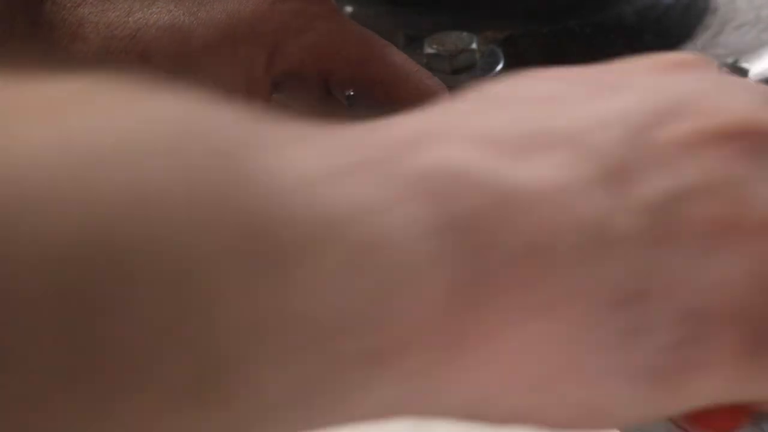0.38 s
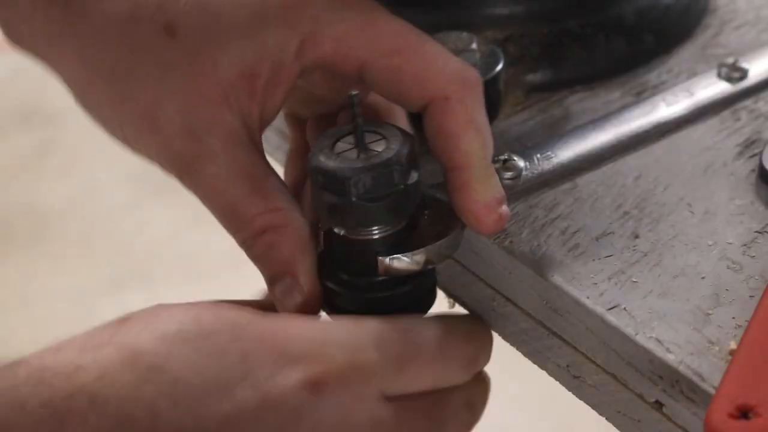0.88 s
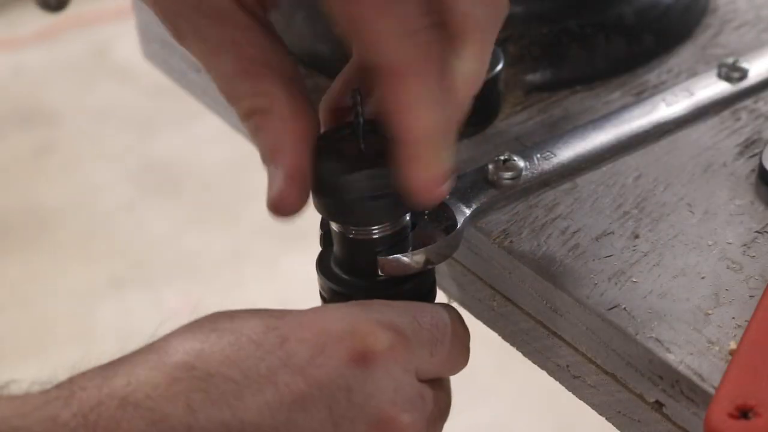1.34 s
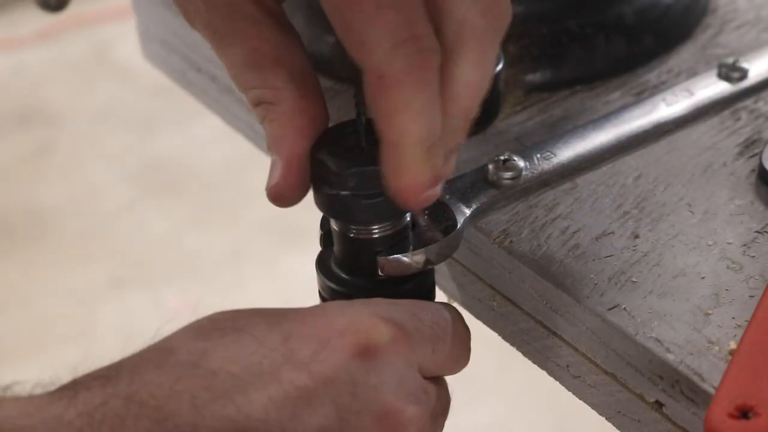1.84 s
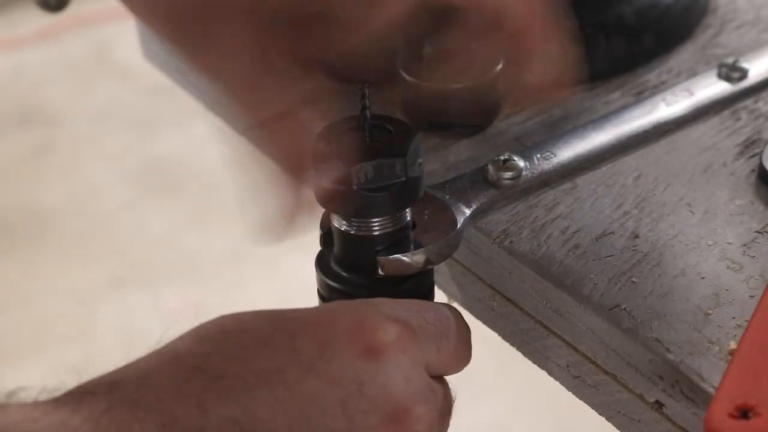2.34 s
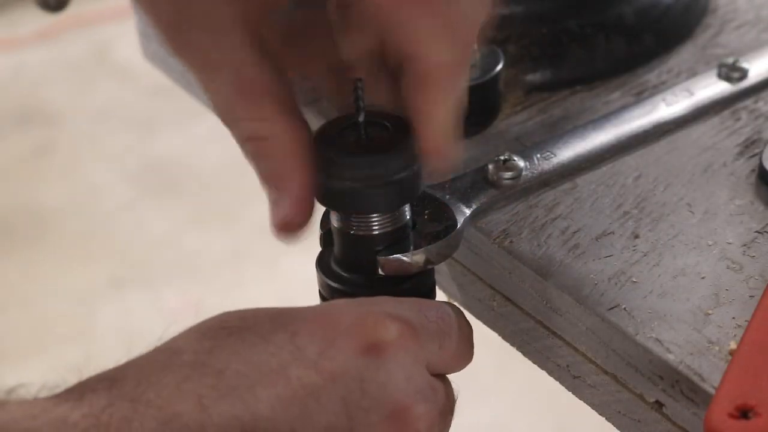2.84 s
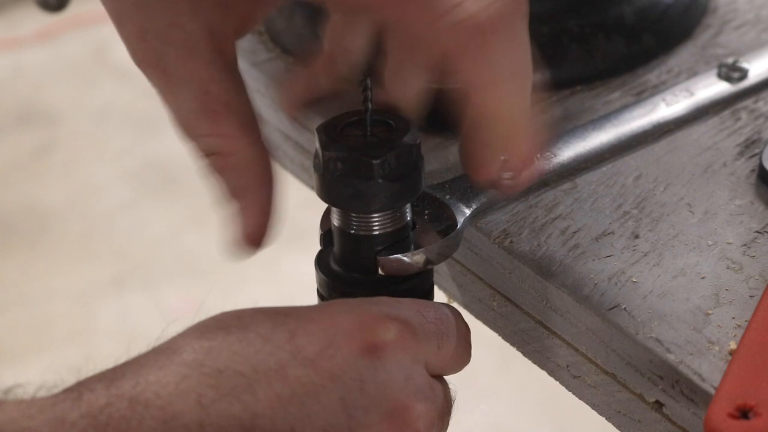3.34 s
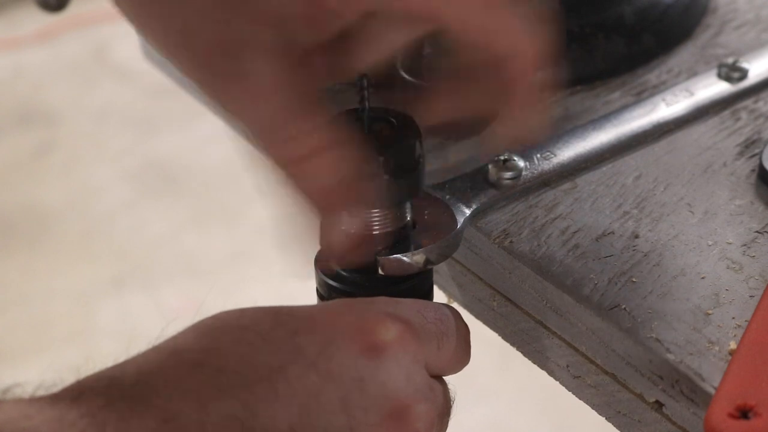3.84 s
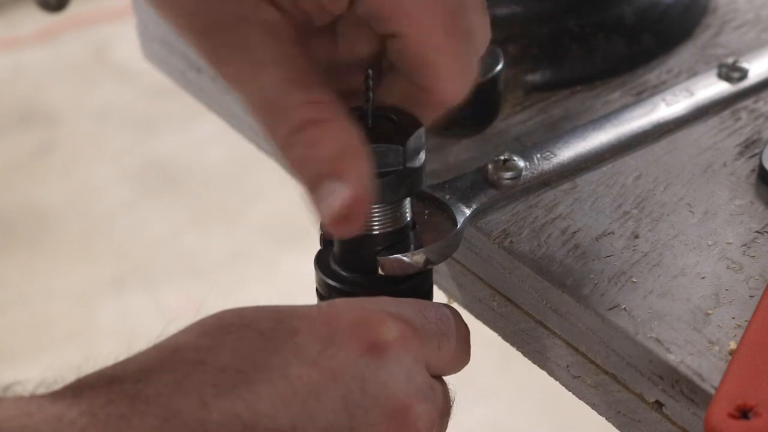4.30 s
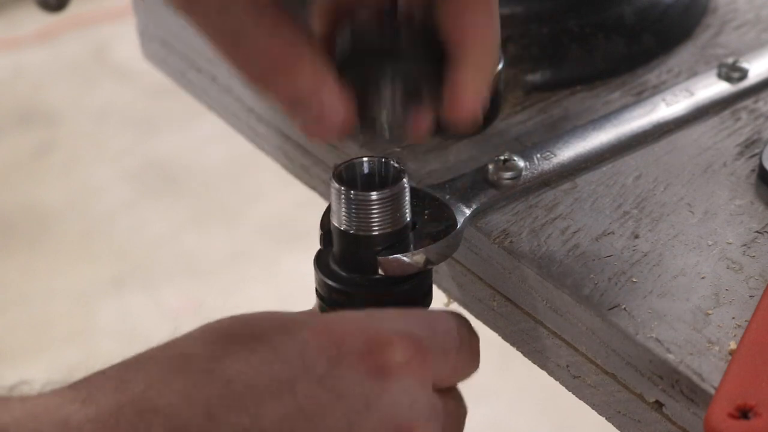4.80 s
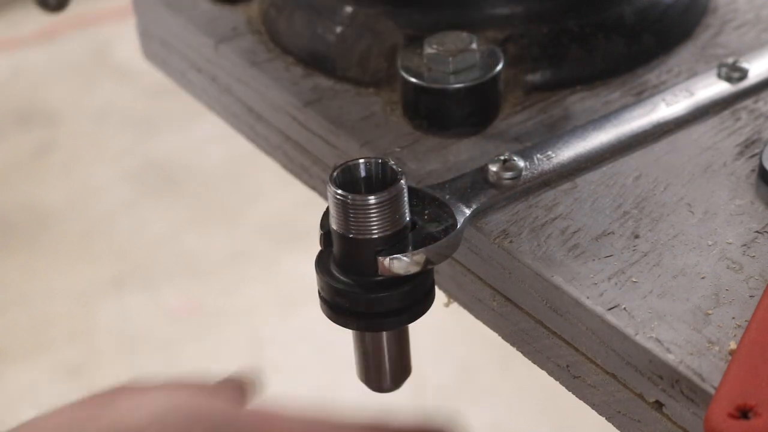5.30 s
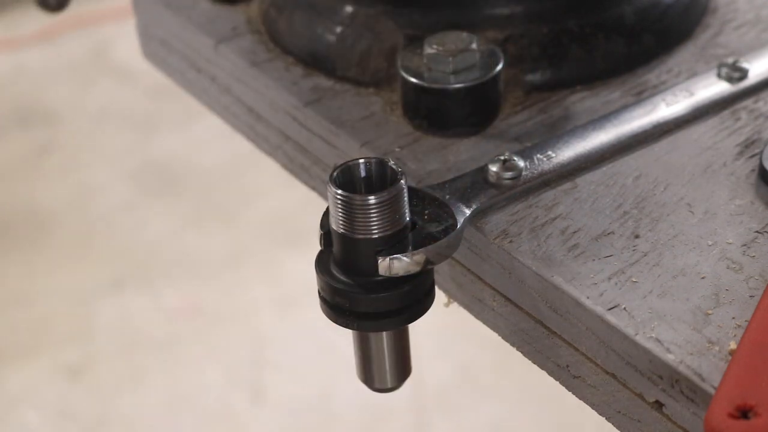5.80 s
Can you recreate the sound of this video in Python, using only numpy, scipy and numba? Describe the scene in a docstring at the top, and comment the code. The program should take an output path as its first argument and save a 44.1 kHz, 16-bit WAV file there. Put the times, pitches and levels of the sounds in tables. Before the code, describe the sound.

A steel wrench clatters onto a workbench and skids, then fingers spin a nut off a tool holder with ticks, scuffs and tiny squeaks.

```python
"""Dropped wrench and a spun nut

A steel wrench drops on a workbench, bounces and skids; then fingers spin a nut off a tool holder, turn by turn.
The blows ring damped modes of bench, steel and holder; the nut ticks, scuffs, rubs and squeaks (gliding overtones).
A hard workshop echoes it all in dense decaying noise, over a hush with mains hum and a brushing hand.
A close microphone limits the loudest blows, so the echo swells up after them."""
import sys
import numpy as np
from scipy import signal
from scipy.fft import rfft, irfft
from scipy.io import wavfile
from scipy.ndimage import uniform_filter1d, map_coordinates
from numba import njit

SR = 44100
rng = np.random.default_rng(int(sys.argv[2]) if len(sys.argv) > 2 else 0)


def transcribe(u):
    """Save the signal u as a 16-bit wav file named by the first command-line argument.

    u: samples, shape (n,) or (channels, n), limited to [-1, 1]; the rate is SR.
    q: integer samples, one column per channel.
    """
    v = np.clip(np.atleast_2d(u).T, -1, 1)
    q = np.round(v * 32767).astype(np.int16)
    wavfile.write(sys.argv[1], SR, q)


def ratio(d):
    """dB to gain"""
    e = np.asarray(d, float) / 20
    return 10 ** e


N = 261072
T = np.arange(N) / SR

# wrench bounces: t/s, blow level/dB, steel ring against the blow/dB, crack against the blow/dB
BOUNCES = [(0.4982, -15, -13.5, -26), (0.5112, -19.5, -20, -8.5), (0.549, -45, -2, -20),
           (0.5604, -23, -11, -14), (0.579, -25.5, -20, -26), (0.609, -27.5, -23, -20),
           (0.621, -47, -2, -22), (0.6354, -19, -22.5, -15), (0.6526, -3.5, -18, -7.5),
           (0.699, -23, -5, -14), (0.731, -32.5, -4, -5), (.745, -25, -12.5, -16)]
# modes of the bench: f/Hz, level/dB, t60/s
BENCH_MODES = [(370, -11, .05), (436, -9, .05), (530, -11, .04), (690, -11, .035), (745, -9, .035),
               (850, -8, .03), (920, -8, .035), (1010, -6, .035), (1098, -4, .04), (1258, 0, .045),
               (1400, -4, .03), (1510, -3, .035), (1712, -9, .02), (2000, -13, .02)]
# high modes of the nut: f/Hz, level/dB, t60/s
NUT_MODES = [(12500, -12, .025), (14800, -3, .012)]


def level(x, db):
    """Scale to an rms level."""
    return x * ratio(db) / np.sqrt(np.mean(x ** 2))


def on_log(hz, table):
    """Read a (f/Hz, value) table on a log frequency axis."""
    table_hz, values = np.array(table)[:, 0], np.array(table)[:, 1]
    return np.interp(np.log(hz + 1), np.log(table_hz), values)


def colour(table):
    """Noise with the given spectrum."""
    spectrum = rfft(rng.standard_normal(N))
    return irfft(spectrum * ratio(on_log(np.fft.rfftfreq(N, 1 / SR), table)), N)


def band(x, hz, octaves):
    """Band-pass reaching the given octaves to either side of hz."""
    edges = np.clip([hz * 2 ** -octaves, hz * 2 ** octaves], 50, .45 * SR)
    return signal.sosfilt(signal.butter(2, edges, "band", fs=SR, output="sos"), x)


def ring(x, modes):
    """Damped resonators; a unit click rings each at its dB."""
    out = 0
    for hz, db, t60 in modes:
        pole = np.exp(2j * np.pi * hz / SR - np.log(1000) / (max(t60, 1e-3) * SR))
        out = out + ratio(db) * signal.lfilter([1], [1, -pole], x).imag
    return out


def add(track, s, sound, db):
    """Mix a sound in at time s with its peak at db."""
    i = int(s * SR)
    track[i:i + len(sound)] += (sound * ratio(db) / np.abs(sound).max())[:N - i]


def contact(rise_s, fall_s):
    """A short rough push: noise that rises and dies."""
    t = T[:8000]
    swell = 1 - np.exp(-t / max(rise_s, 1e-5))
    return rng.standard_normal(len(t)) * swell * np.exp(-t / max(fall_s, 1e-4))


def click(fall_s, scatter):
    """One sharp contact with a little chatter behind it."""
    push = scatter * contact(0.0015, fall_s)
    push[0] = 1
    return push


def grit(per_s, spread_db):
    """Sparse random clicks of uneven size."""
    chance = rng.random((2, N))
    size = ratio(-spread_db * np.log(1 - chance[1]))
    return (chance[0] < per_s / SR) * size * rng.choice([-1, 1], N)


def held(rows, attack_s, release_s):
    """Gain over time: each (start, length, dB) row rises, holds and lets go."""
    gain = 0
    for s, length, db in rows:
        slopes = np.minimum((T - s) / attack_s, (s + length - T) / release_s)
        gain = gain + ratio(db) * np.clip(slopes, 0, 1)
    return gain


def wrench():
    """Each bounce thuds on the bench, rings the steel and cracks."""
    # modes of the wrench: f/Hz, level/dB, t60/s
    wrench_modes = [(2455, -3, .05), (4452, -12, .055), (5190, 0, .035), (7257, -9, .03)]
    thuds, steel = np.zeros((2, N))
    for s, db, steel_db, crack_db in BOUNCES:
        # wood gives way, so the bench feels a softer push than the steel
        add(thuds, s, ring(band(click(0.0084, 0.12), 840, 1.31), BENCH_MODES), db)
        add(steel, s, ring(band(click(0.004, 0.16), 4200, 0.7), wrench_modes), db + steel_db)
        add(thuds, s, band(click(.001, .15), 3000, 1.5), db + crack_db)
    return thuds, steel


def add_thumps(dry):
    """The bench's deep shudder under each bounce: one low damped mode, mixed into dry."""
    thump_hz, thump_db = 125, -39
    for s, db, _, _ in BOUNCES:
        add(dry, s, ring(click(0.0079, 0.14), [(thump_hz, 0, .06)]), db + thump_db)


def skids():
    """The wrench rocks and skids between bounces: many small knocks on the bench and a grainy scrape."""
    # skids: start t/s, length/s, level/dB of the push before the gains below
    skid_rows = [(.575, 0.06, -42.5), (.75, 0.11, -35.5)]
    knocks_per_s, knock_db, scrape_db = 210, -28, 1
    knocks, gain = grit(knocks_per_s, 1.5), held(skid_rows, .03, .04)
    knocks = level(knocks, 0) * gain
    scrape = band(rng.standard_normal(N) * gain, 2670, 0.29)
    return ratio(knock_db) * ring(band(knocks, 820, 1.5), BENCH_MODES) + ratio(scrape_db) * scrape


def thud(push, hz):
    """Holder and bench answer: holder modes near hz stand out, a little different each time."""
    # modes of the tool holder: f/Hz, level/dB, t60/s
    holder_modes = [(368, -1, .07), (745, -2, .03), (860, 0, .026), (980, 0, .024), (1120, -2, .02),
                    (1490, -2, .016)]
    scatter_db = 3
    modes = [(f, db + scatter_db * rng.standard_normal(), t60) for f, db, t60 in holder_modes]
    return ring(band(push, hz, 0.21), modes) + ratio(1.0) * ring(push, BENCH_MODES)


def ticks():
    """Steel on steel: heavily damped bite, a dry broad crack, a treble snap, a thud."""
    # sharp ticks: t/s, crack peak level/dB, crack f/Hz, thud against crack/dB, treble against crack/dB
    tick_rows = [(0.9698, -42, 2280, -17, -30), (0.9841, -37.5, 2590, -0.5, -34),
                 (1.0012, -21, 2740, -15, -21), (1.01, -35.5, 2240, 5.5, -40), (1.049, -35.5, 2310, 0, -26),
                 (1.0874, -27.5, 2170, -6, -37), (1.106, -31.5, 2380, 4, -40), (1.11, -22.5, 2570, -9, -26),
                 (1.1147, -32, 2120, -12, -29), (1.2, -35.5, 4440, -18, -31),
                 (1.294, -27.5, 5250, -10, -56), (1.3624, -35.5, 5150, 1.5, -37),
                 (1.5857, -37.5, 2180, -1.5, -29), (1.7087, -35, 4830, -12, -45),
                 (2.044, -29.5, 3150, -5, -19), (2.188, -48, 5840, -20, -8), (2.47, -26, 5250, -15, -5.5),
                 (2.776, -43, 4300, -7.5, -44), (2.8814, -56.5, 6000, -5, 4), (3.1741, -38, 2200, -2, -30),
                 (3.2812, -9.5, 2730, -15.5, -10.5), (3.286, -15.5, 1920, -8.5, -21),
                 (3.534, -30, 2800, -7.5, -3.5), (3.572, -37.5, 2560, 6.5, -25.5),
                 (3.6744, -51, 2850, 3, -22), (3.7751, -37, 3380, -8, -30), (3.784, -29.5, 2230, -4.5, -24),
                 (4.1252, -40, 2500, -1.5, -23), (4.2133, -30.5, 2940, -14.5, -15),
                 (4.2676, -40, 2800, -2.5, -28), (4.2828, -37, 2310, 3, -33), (4.4361, -42, 4150, -9, -43),
                 (4.4694, -57, 6000, -0.5, 1), (4.6602, -49.5, 3050, -24, -6),
                 (5.778, -46.5, 3600, -27, -24), (5.7905, -47.5, 2960, -33, -33)]
    # heavily damped steel in each tick: f/Hz, level/dB, t60/s
    bite_modes = [(5210, 0.5, 0.019), (3600, 13.5, 0.0023), (2470, -2, 0.02), (1970, 1.5, 0.021)]
    bite_db, thud_hz, thud_lag_s = -8.5, 980, 0.000996
    out = np.zeros(N)
    for s, db, hz, thud_db, treble_db in tick_rows:
        push = click(.003, .25)
        add(out, s, ring(push, bite_modes), db + bite_db)
        add(out, s, band(band(push, 0.88 * hz, 0.51), hz, 1.72), db)
        snap = click(.0008, .2)
        treble = band(band(snap, 11300, .35), 11300, .35) + ratio(-7) * ring(snap, NUT_MODES)
        add(out, s, treble, db + treble_db)
        add(out, s + thud_lag_s, thud(contact(0.00072, 0.0087), thud_hz), db + thud_db)
    return out


def scuffs():
    """The thread catches and drags: a longer, softer push makes a scrape and a thud."""
    # soft scuffs: t/s, scrape peak level/dB, thud against scrape/dB, centre of the push f/Hz, length/s
    scuff_rows = [(1.0328, -44, 8, 1050, 0.014), (1.151, -34, -3.5, 830, 0.0069),
                  (1.3437, -30.5, -4.5, 680, 0.0056), (1.475, -48.5, -5, 1580, 0.017),
                  (1.51, -49, 3, 965, 0.018), (1.534, -47.5, 1.5, 950, 0.0043),
                  (1.9573, -52, 7, 344, 0.013), (2.0333, -37, -3.5, 880, 0.013),
                  (2.054, -57, 20.5, 885, 0.0093), (2.195, -50, -5, 870, 0.026),
                  (2.244, -49, -14.5, 1490, 0.031), (2.589, -42, -5, 1560, 0.034),
                  (2.874, -63.5, 14, 574, 0.031), (2.959, -47.5, 2, 900, 0.0065),
                  (2.97, -35.5, -7, 910, 0.012), (3.194, -53, 5.5, 1190, 0.033),
                  (3.464, -55, 14, 1000, 0.0077), (3.599, -51.5, 6, 920, 0.016),
                  (4.141, -52.5, -1.5, 378, 0.024), (4.233, -36.5, 0.5, 960, 0.011),
                  (4.5993, -46.5, -2, 980, 0.025), (4.644, -50, 4.5, 394, 0.015),
                  (4.78, -75, 18.5, 417, 0.0052), (5.166, -60.5, 10.5, 830, 0.014),
                  (5.2946, -68, 13, 790, 0.0057)]
    scrape_hz = 1955  # the two bands of the scrape lie below and above it
    out = np.zeros(N)
    for s, db, thud_db, push_hz, length_s in scuff_rows:
        push = contact(length_s / 2, length_s)
        scrape = band(band(push, 0.46 * scrape_hz, 0.39), 1.42 * scrape_hz, 0.56)
        add(out, s, scrape, db)
        add(out, s, thud(band(push, 370, 1.35), push_hz), db + thud_db)
    return out


def squeaks():
    """Stick-slip whistle: gliding, fluttering overtones, loudest where they cross a narrow resonance."""
    # squeaks of the thread, one list of points each: t/s, stick-slip rate f/Hz, level/dB
    squeak_paths = [
        [(2.198, 1797, -63), (2.21, 2107, -56), (2.225, 2247, -55), (2.245, 2120, -57), (2.254, 1802, -40),
         (2.258, 1895, -60), (2.262, 1786, -49.5), (2.272, 1190, -58)],
        [(2.581, 1465, -49), (2.586, 1710, -55), (2.593, 2034, -44), (2.599, 2896, -66), (2.615, 2920, -38),
         (2.623, 2560, -57), (2.64, 2340, -53)],
        [(2.892, 1240, -58), (2.897, 1944, -57), (2.904, 2720, -40.5), (2.91, 3050, -52), (2.917, 3616, -47.5),
         (2.926, 3660, -59), (2.934, 3150, -57), (2.947, 3300, -67)],
        [(4.64, 2630, -72), (4.653, 2930, -52.5), (4.666, 2780, -69)],
    ]
    # voice of each squeak: step from one overtone to the next/dB, pitch flutter (0-1)
    voices = [(-13, .22), (-25, .36), (-11, .12), (-30, .45)]
    resonance_hz, lift_db, width_octaves = 3720, 19, .06
    out = np.zeros(N)
    for path, (overtone_db, wobble) in zip(squeak_paths, voices):
        s, hz, db = np.transpose(path)
        now = (T > s[0]) & (T < s[-1])
        flutter = uniform_filter1d(rng.standard_normal((2, N // 20)), size=60)[:, :now.sum()]
        rate = np.interp(T[now], s, hz)
        phase = 2 * np.pi * np.cumsum(rate * (1 + wobble * flutter[0])) / SR
        stack = 0
        for k in range(1, 4):
            octaves_off = np.log2(k * rate / resonance_hz)
            resonance_db = lift_db * np.exp(-(octaves_off / width_octaves) ** 2)
            stack = stack + ratio(overtone_db * (k - 1) + resonance_db) * np.sin(k * phase)
        out[now] += ratio(np.interp(T[now], s, db) + 24 * flutter[1]) * stack
    return out


def rub():
    """Gritty sliding of the thread sings in the nut's high modes; the loose nut chatters as it turns."""
    # fingers turning the nut: start t/s, length/s, rub level/dB
    turn_rows = [(1.47, 0.12, -80), (2.2, 0.071, -71), (2.57, 0.091, -75), (2.88, 0.082, -69.5),
                 (3.16, 0.091, -69.5), (3.53, 0.067, -80), (3.68, 0.12, -80.5), (4.19, 0.12, -76),
                 (4.6, 0.028, -70.5)]
    attack_s, release_s = 0.018, 0.0099
    chatter_per_s, chatter_db = 470, 10  # dB against the rub
    sliding = rng.standard_normal(N) * ratio(2.5 * rng.exponential(size=N))
    singing = level(ring(sliding, NUT_MODES) + 4.0 * band(sliding, 11700, 0.37), 0)
    chatter = band(band(grit(chatter_per_s, 1.5), 2600, .6), 2600, .6)
    return (singing + level(chatter, chatter_db)) * held(turn_rows, attack_s, release_s)


def pings():
    """A single high steel mode rings until a finger damps it; the lifted nut jingles faintly."""
    # clear pings: t/s, peak level/dB
    ping_rows = [(1.199, -43), (2.47, -52)]
    # jingle of the lifted nut: start t/s, length/s, level/dB
    lifted_rows = [(4.64, 0.73, -90)]
    ping_hz, t60_s, held_s = 6670, 0.3, .026
    t = T[:SR]
    out, tap = np.zeros(N), 1. * (t == 0)
    free = np.clip(np.minimum(t / .005, (held_s - t) / .01), 0, 1)
    for s, db in ping_rows:
        add(out, s, free * ring(tap, [(ping_hz, 0, t60_s)]), db)
    # noise keeps the nut's lowest mode ringing
    jingle = level(ring(rng.standard_normal(N), [(NUT_MODES[0][0], 0, .1)]), 0)
    return out + jingle * held(lifted_rows, 0.018, 0.24)


def brush():
    """A hand brushing over the bench: soft, slightly grainy noise of skin on wood swells and fades."""
    # strokes: t/s of the loudest moment, level/dB there, rise/(dB per s), fall/(dB per s)
    strokes = [(.45, -65.5, 74, 96), (1.95, -72.5, 44, 114), (5.4, -74, 31, 13), (5.781, -67, 280, 304)]
    # colour of skin on wood: f/Hz, density/(dB per Hz), relative
    skin_colour = [(200, -35), (600, 2), (1200, 4.5), (3500, -4), (7000, -12.5), (16000, -19)]
    grain = ratio(1.5 * np.repeat(rng.exponential(size=N // 40 + 1), 40)[:N])
    gain = sum(ratio(db - np.maximum(rise * (s - T), fall * (T - s))) for s, db, rise, fall in strokes)
    return level(colour(skin_colour) * grain, 0) * gain


def decay(noise):
    """Let each band of a noise die at the room's own rate."""
    # decay of the workshop: f/Hz, t60/s
    room_t60 = [(200, 0.82), (500, 0.55), (1000, 0.62), (2000, 0.68), (4000, 0.44), (6500, 0.32)]
    hz, out = np.fft.rfftfreq(N, 1 / SR), 0
    for k in range(len(room_t60)):
        # bands cross-fade into their neighbours
        share = on_log(hz, [(f, j == k) for j, (f, _) in enumerate(room_t60)])
        out = out + irfft(rfft(noise) * share, N) * ratio(-60 * T / room_t60[k][1])
    return out


def room(dry):
    """Dense echo builds up over the first reflections; walls and air swallow the treble.
    Moving hands change the paths, so the echo pattern changes from moment to moment."""
    echo_db, build_up_s, top_hz = -11.5, 0.0022, 7200
    pattern_s, drift_s = .03, .0002  # spacing of the echo patterns, rough wander of the delays
    treble_cut = signal.butter(8, top_hz, fs=SR, output="sos")
    out, turn = 0, T / pattern_s % 3
    for k in range(3):
        tail = decay(rng.standard_normal(N))[:SR] * (1 - np.exp(-(T[:SR] / build_up_s) ** 2))
        tail = signal.sosfilt(treble_cut, tail)
        # three patterns take turns, cross-fading at equal power
        share = np.sqrt(np.clip(1 - np.abs((turn - k + 1) % 3 - 1), 0, 1))
        out = out + signal.fftconvolve(dry * share, tail / np.sqrt(np.sum(tail ** 2)))[:N]
    wander = uniform_filter1d(uniform_filter1d(rng.standard_normal(N), size=700), size=700)
    drift = 30 * drift_s * SR * wander  # 30 makes up for the smoothing
    return map_coordinates(out, [np.arange(N) + drift], mode="mirror") * ratio(echo_db)


def earlier_knock():
    """The dying echo of an earlier knock: coloured noise that decays with the room."""
    # colour of the echo: f/Hz, density/(dB per Hz), relative
    knock_colour = [(150, -19), (250, -23), (375, -3.5), (588, -15.5), (949, -2.5), (1730, -5), (3770, -10),
                    (9000, -44), (12000, -80)]
    return decay(level(colour(knock_colour), -45))


def air():
    """Workshop hush with a wavering mains hum."""
    # colour of the hush: f/Hz, density/(dB per Hz), relative
    hush_colour = [(20, -10), (45, -4.5), (60, -3), (90, 1.5), (160, -2), (300, -0.5), (1200, -7.5),
                   (2500, -14), (6000, -22), (12000, -25), (16400, -21)]
    hush_db, hum_hz, hum_db = -71, 60, -78
    waver = 1 + 8 * uniform_filter1d(rng.standard_normal(N), size=3000)
    return level(colour(hush_colour), hush_db) + ratio(hum_db) * waver * np.sin(2 * np.pi * hum_hz * T)


def scene():
    """Near sources, their echo, the dying echo of an earlier knock, the hush."""
    thuds, steel = wrench()
    dry = thuds + skids() + ticks() + scuffs() + squeaks() + rub() + brush()
    # small parts radiate almost no bass
    dry = signal.sosfilt(signal.butter(4, 281.5, "high", fs=SR, output="sos"), dry)
    add_thumps(dry)
    ping = pings()
    # such high tones beam away from the walls, so less of them reaches the echo
    high_echo = room(ratio(-9) * ping + ratio(-3) * steel)
    mix = dry + room(dry) + ping + steel + high_echo + earlier_knock() + air()
    return np.tile(mix, (2, 1))


@njit
def limiter(x, top, release):
    """Gain drops at once on a peak, lingers, then swells back to one (two lags in a row)."""
    gain, g, aim = np.empty(len(x)), 1., 1.
    for i in range(len(x)):
        most = top / (abs(x[i]) + 1e-9)
        aim = min(aim + (1 - aim) * release, most)
        g = min(g + (aim - g) * release, most)
        gain[i] = g
    return gain


def top_cut(x):
    """Nothing passes above the cut-off."""
    return signal.sosfilt(signal.butter(12, 16540, fs=SR, output="sos"), x)


def record(dry):
    """One microphone, a limiter, the steady hiss of the electronics, part of it opposite left and right."""
    # colour of the hiss that is opposite left and right: f/Hz, density/(dB per Hz), relative
    apart_colour = [(12, -38), (20, -2), (113, -7.5), (558, -10.5), (1570, -18), (3630, -15.5), (4540, -11),
                    (11100, -10), (16000, -18.5)]
    limit, release_s, top_hz = 0.112, 0.081, 15600  # limit: peak amplitude, full scale 1
    hiss = level(colour(apart_colour), -84) * np.array([[1], [-1]])
    hiss = hiss + level(rng.standard_normal(N), -81)
    treble_cut = signal.ellip(8, .2, 60, top_hz, fs=SR, output="sos")
    dry = signal.sosfilt(treble_cut, dry)
    gain = limiter(dry[0], limit, 1 / (release_s * SR))
    mix = dry * gain + signal.sosfilt(treble_cut, hiss)
    return top_cut(mix)


dry = scene()
out = record(dry)
transcribe(out)
```